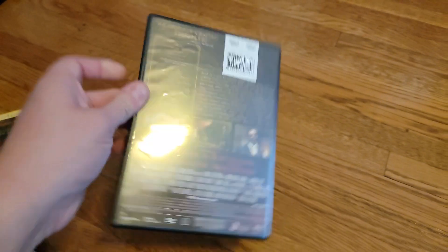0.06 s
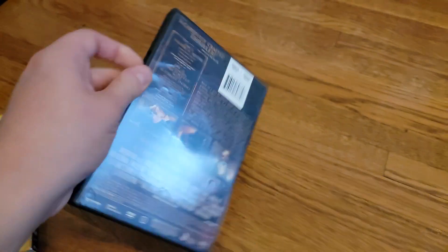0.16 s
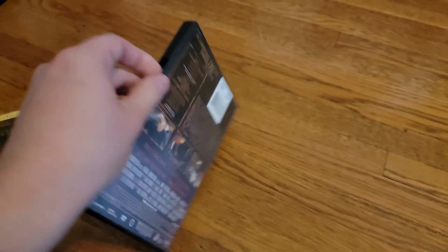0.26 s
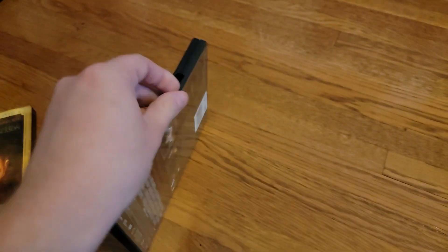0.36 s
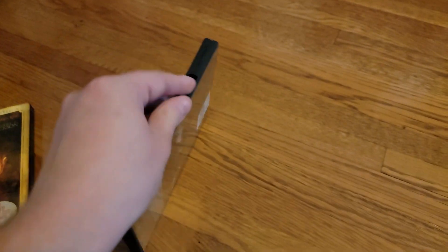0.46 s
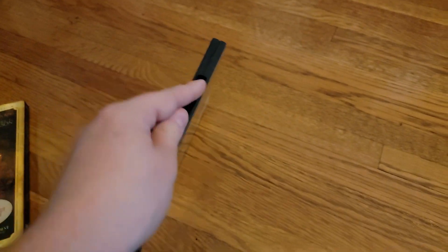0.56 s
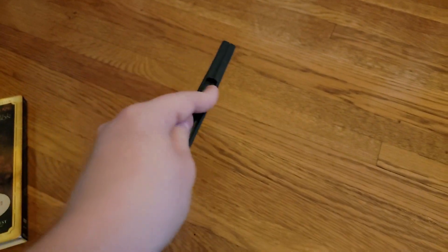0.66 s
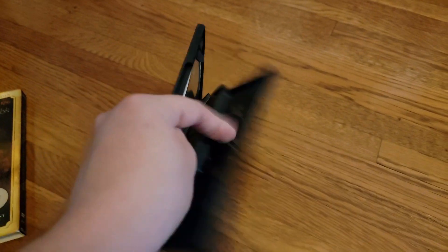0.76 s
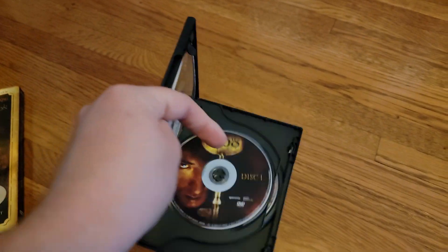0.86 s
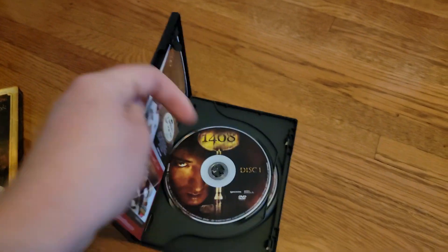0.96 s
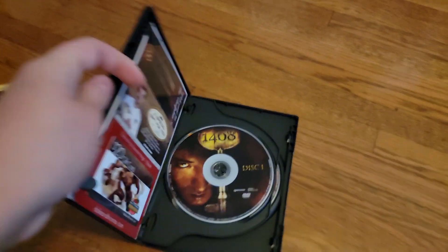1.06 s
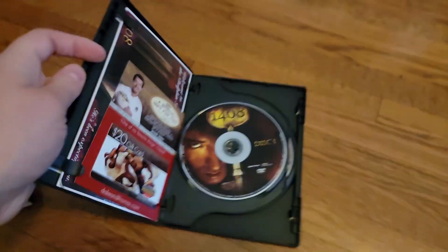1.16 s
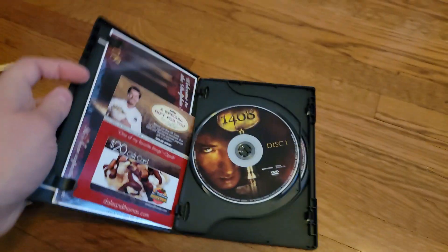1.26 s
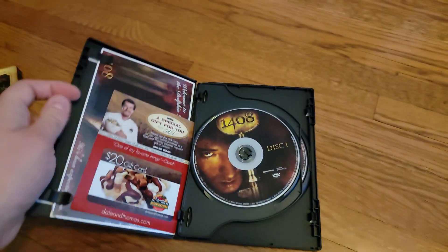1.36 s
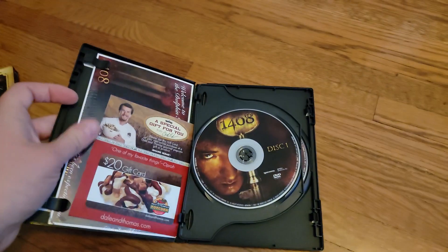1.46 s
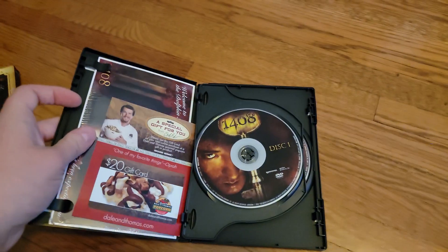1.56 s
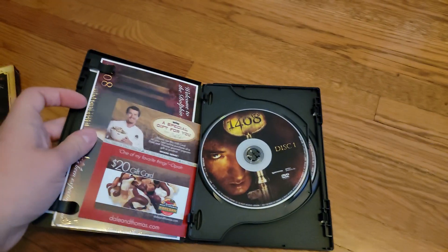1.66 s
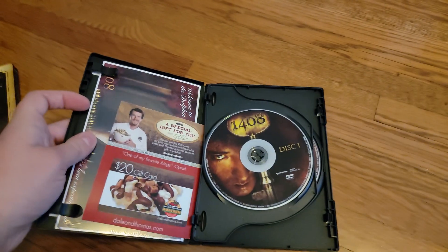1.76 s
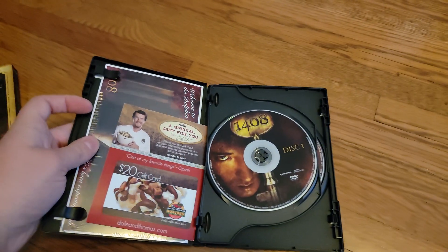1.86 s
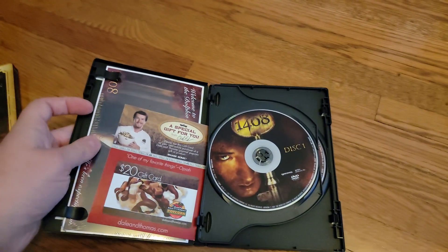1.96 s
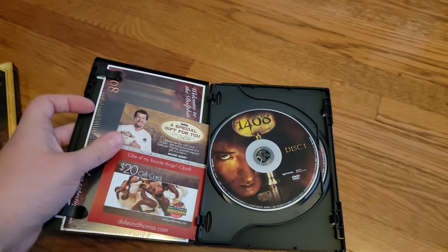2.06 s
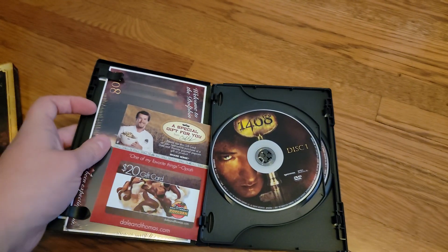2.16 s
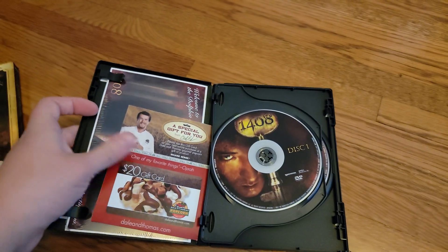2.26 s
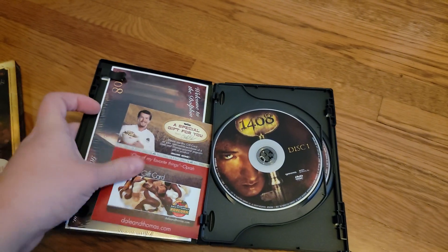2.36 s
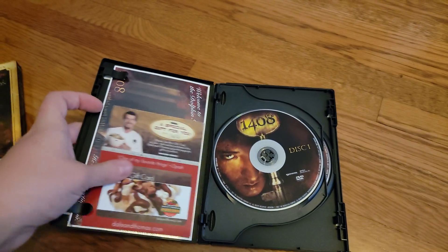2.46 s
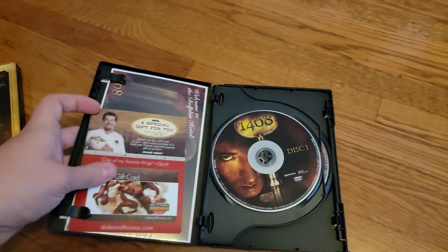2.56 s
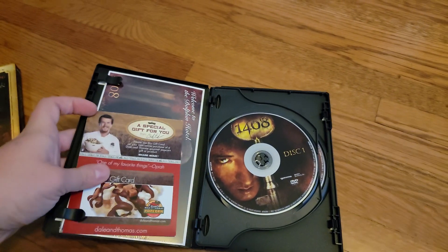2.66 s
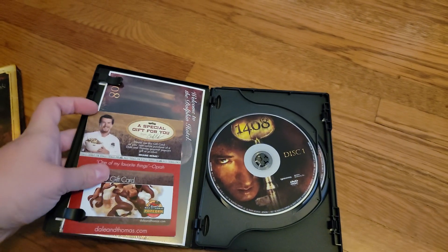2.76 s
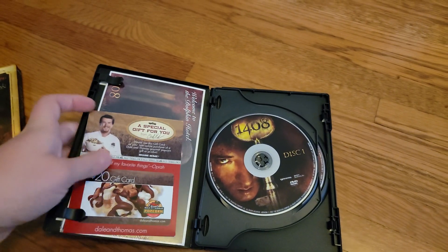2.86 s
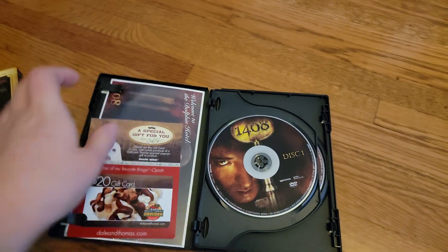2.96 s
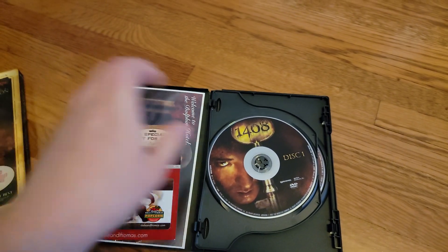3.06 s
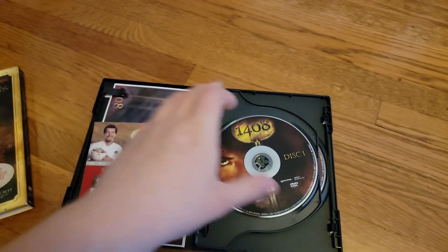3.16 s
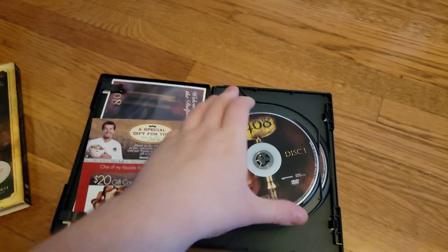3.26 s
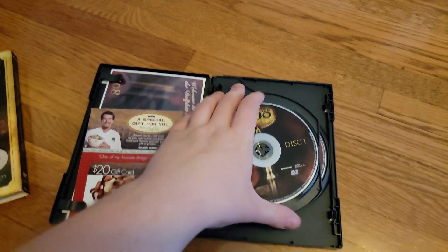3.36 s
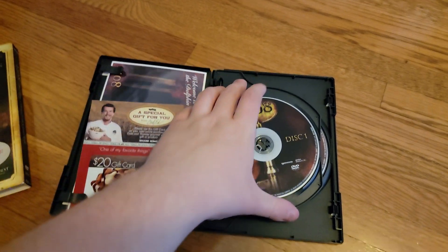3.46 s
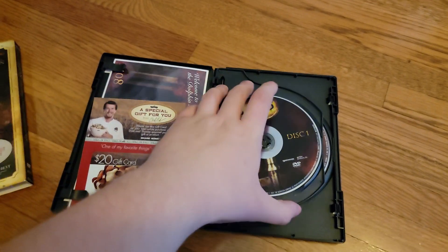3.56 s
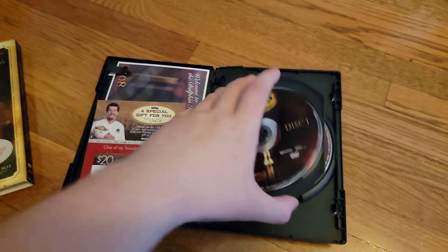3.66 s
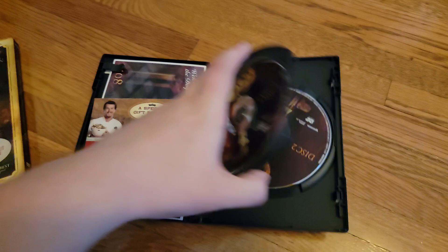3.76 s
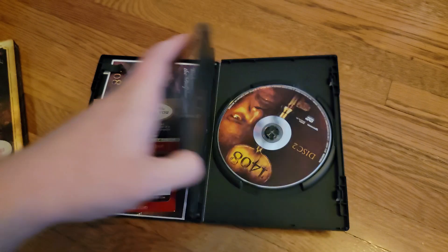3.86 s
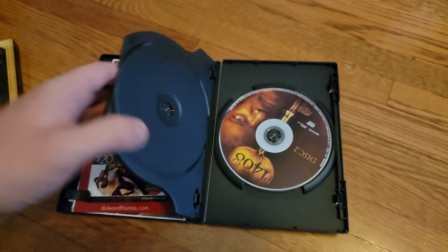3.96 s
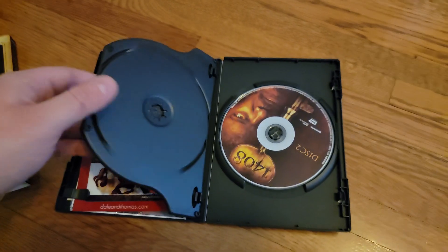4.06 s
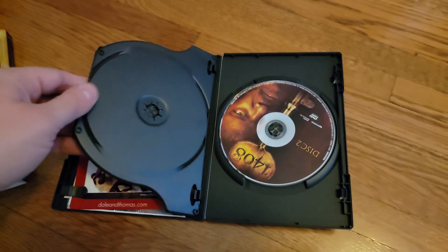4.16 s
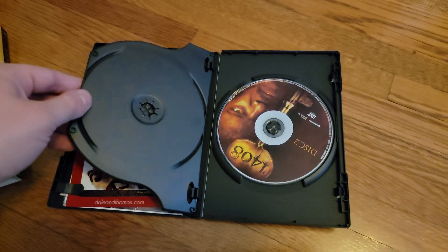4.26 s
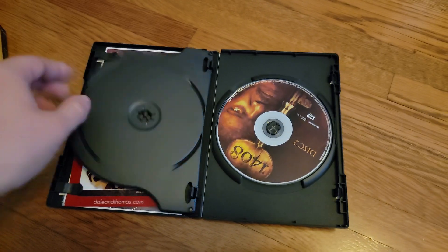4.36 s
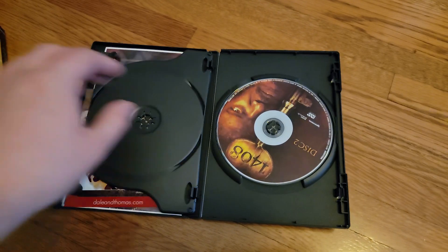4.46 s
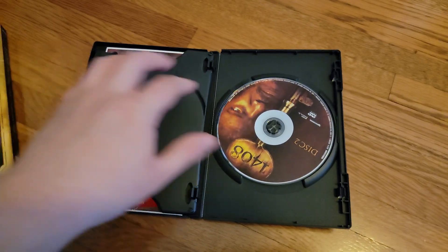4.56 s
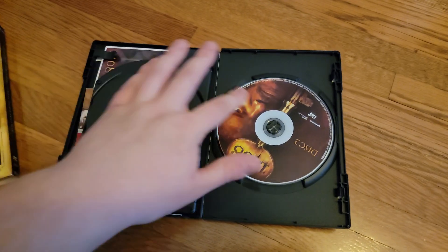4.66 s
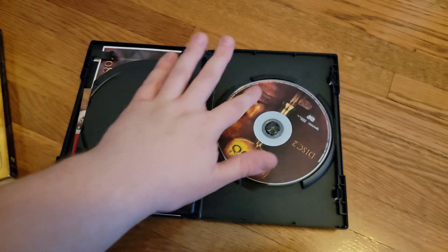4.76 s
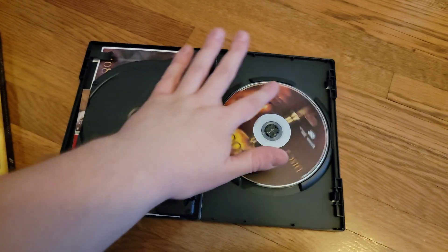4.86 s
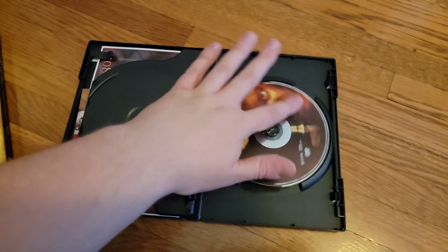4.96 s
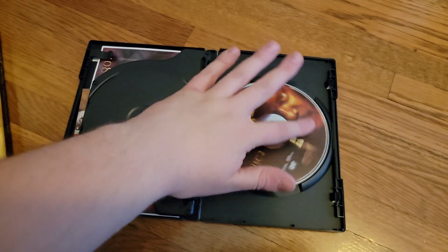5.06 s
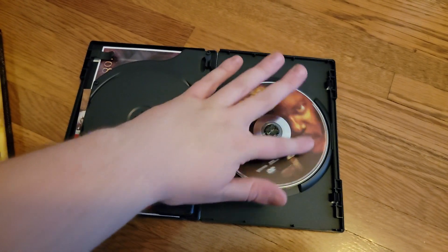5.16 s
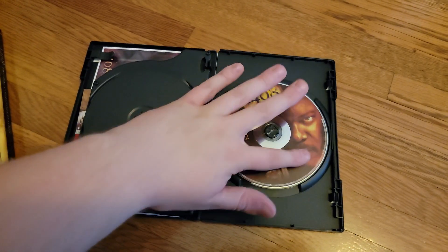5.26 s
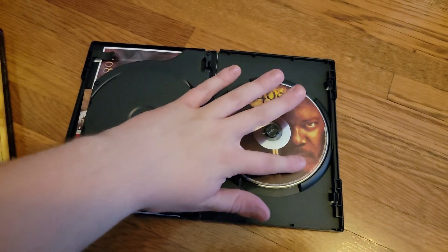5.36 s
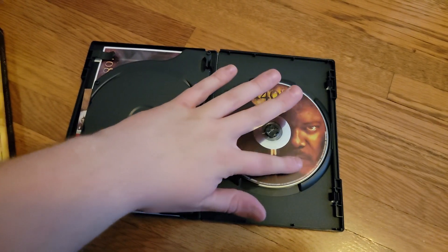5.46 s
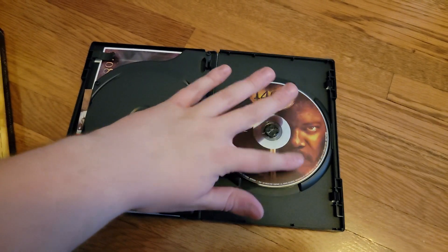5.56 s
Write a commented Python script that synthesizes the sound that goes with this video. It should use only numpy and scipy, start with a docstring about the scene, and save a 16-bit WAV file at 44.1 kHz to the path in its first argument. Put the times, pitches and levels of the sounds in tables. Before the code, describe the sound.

Sharp plastic snaps as a disc case is opened on a wooden floor, then small clicks, a swinging tray and another hard snap.

```python
"""Latches, edges and catches of a plastic disc case snap as it is opened on a wooden floor: noise bursts through plastic.
The sleeve crackles in single flips, taps and disc clicks excite decaying modes, the tray rattles, its hinge chirps.
Fingers scuff in showers of micro-clicks; cloth is filtered noise swept by the arm; air and a low hum lie beneath.
A small room is decaying band noise. The left microphone is muffled, so nearly all is heard on the right.
Table levels are relative: trims and mix gains in the functions follow."""
import sys
import numpy as np
from scipy import signal
from scipy.fft import rfft, irfft
from scipy.io import wavfile
from scipy.ndimage import uniform_filter1d

SR = 44100
rng = np.random.default_rng(int(sys.argv[2]) if len(sys.argv) > 2 else 0)


def output_pcm(signal):
    """Save a mono or channel-first signal as 16-bit PCM at the path in sys.argv[1].

    Samples are clipped to [-1, 1] before scaling.
    """
    pcm = np.clip(np.atleast_2d(signal).T, -1, 1) * 32767
    wavfile.write(sys.argv[1], SR, np.round(pcm).astype(np.int16))


N = 247928
TIME = np.arange(N) / SR
LYING_S = 1.2  # from here the case lies open on the floor
PART_DB, PART_WIDTH = -2, 0.2  # boost of the struck part; half width as a share of its pitch


def undb(db):
    """Decibels to gain."""
    return 10 ** (np.asarray(db) / 20)


def along(hz, points_hz, values):
    """Straight lines on a log-frequency axis."""
    return np.interp(np.log(np.maximum(hz, 1)), np.log(points_hz), values)


def colour(x, points, size=2048):
    """Minimum-phase filter with the given (f/Hz, gain/dB) response, by folding the cepstrum."""
    gain_db = along(np.fft.rfftfreq(size, 1 / SR), *np.transpose(points))
    cepstrum = irfft(np.log(undb(gain_db)))
    cepstrum[1:size // 2] *= 2
    cepstrum[size // 2 + 1:] = 0
    impulse = irfft(np.exp(rfft(cepstrum)))
    return signal.fftconvolve(x, impulse)[:len(x)]


def band(x, lo_hz, hi_hz):
    """Butterworth band-pass."""
    return signal.sosfilt(signal.butter(2, [lo_hz, hi_hz], "band", fs=SR, output="sos"), x)


def rms(x):
    """Root-mean-square level."""
    return np.sqrt(np.mean(x ** 2))


def loudest(x, size=160):
    """RMS of the loudest few milliseconds."""
    return np.sqrt(uniform_filter1d(x ** 2, size, mode="constant").max())


def fade(t, t60_s):
    """Exponential decay, 60 dB in t60_s."""
    return np.exp(-np.log(1000) * t / max(t60_s, 1e-3))


def add(track, s, x):
    """Mix a sound in at time s."""
    i = max(int(s * SR), 0)
    track[i:i + len(x)] += x[:N - i]


def walk(rate_hz):
    """Random wander: straight lines between normal draws, rate_hz draws a second."""
    knots = rng.standard_normal(512)
    return np.interp(TIME * rate_hz, np.arange(len(knots)), knots)


def modes(table, t, scatter_db=0.5, detune=0.017):
    """Decaying sines; each call draws new weights, signs and slight detuning."""
    out = np.zeros(len(t))
    for hz, db, t60_s in table:
        weight, sign, bend = rng.standard_normal(3)
        sine = np.sin(2 * np.pi * hz * (1 + detune * bend) * t)
        out += undb(db + scatter_db * weight) * np.sign(sign) * sine * fade(t, t60_s)
    return out


# quiet room spectrum: f/Hz, level/dB
AIR_SPECTRUM = [(29, -37.5), (50, -0.5), (63, -4.5), (181, -20.5), (209, -23), (242, -17.5), (380, -21.5),
                (658, -31.5), (987, -25), (1380, -30), (1840, -28), (3180, -37.5), (5770, -42),
                (8070, -60.5), (15000, -49)]
AIR_DB = -70.5
HUM_REST_DB, HUM_EXCESS_DB, HUM_SETTLE_S = -72, 16.5, 1.2  # excess decays by 1/e per settle time
# faint hollow tones at the start: f/Hz, width/Hz, level/dB
AIR_TONES = [(823, 51, -70), (1100, 70, -77)]
AIR_TONE_T60_S = 2.2


def background(hum_hz=38, width_hz=6, wander_db=0.76, hum_wander_db=4.6):
    """Still room air, a wavering low hum that settles, and faint hollow tones that die away."""
    air = colour(rng.standard_normal(N), AIR_SPECTRUM)
    hum_phase = 2 * np.pi * np.cumsum(hum_hz + width_hz / 2 * walk(31)) / SR
    hum = np.sin(hum_phase) * undb(hum_wander_db * walk(21))
    hum_db = HUM_REST_DB + HUM_EXCESS_DB * np.exp(-TIME / HUM_SETTLE_S)
    out = air / rms(air) * undb(AIR_DB + wander_db * walk(1.4))
    out += hum / rms(hum) * undb(hum_db)
    for hz, width, db in AIR_TONES:
        tone = band(rng.standard_normal(N), hz - width / 2, hz + width / 2)
        out += undb(db) * tone / rms(tone) * fade(TIME, AIR_TONE_T60_S)
    return out


# room decay: f/Hz, t60/s, level/dB
ROOM_DECAY = [(120, 0.36, -2), (503, 0.085, -5), (1490.5, 0.27, 2), (3300, 0.33, -6), (6700, 0.19, 2),
              (13800, 0.16, 6.5)]


def room(x, delay_s=0.0073, build_s=0.001, size=32768):
    """Dense reflections of a small room: noise bands, each with its own decay and level."""
    t, edges_hz = TIME[:size], np.geomspace(60, 17000, 10)
    points_hz, t60s, dbs = np.transpose(ROOM_DECAY)
    tail = np.zeros(size)
    for lo, hi in zip(edges_hz, edges_hz[1:]):
        hz = np.sqrt(lo * hi)
        noise = band(rng.standard_normal(size), lo, hi)
        tail += noise * fade(t, along(hz, points_hz, t60s)) * undb(along(hz, points_hz, dbs))
    tail *= 1 - np.exp(-np.maximum(t - delay_s, 0) / build_s)
    return signal.fftconvolve(x, tail / np.linalg.norm(tail))[:N]


# rubbing cloth spectrum: f/Hz, level/dB
CLOTH_SPECTRUM = [(300, -16.5), (1000, -16), (1600, -10), (2600, -1.5), (5000, 0.5), (6700, -1),
                  (8400, -27), (10000, -18), (12000, -9.5), (15500, -20.5)]
# arm sweeps: peak t/s, level/dB, rise/s, fall/s, top treble sheen/dB
ARM_SWEEPS = [(0.609, -59.5, 0.21, 0.13, -5), (1.151, -58.5, 0.45, 0.31, 0), (3.281, -59.5, 0.2, 0.15, 3.5),
              (3.779, -60.5, 0.091, 0.33, 8), (4.0, -63.5, 0.43, 0.28, -2.5), (4.681, -62, 0.21, .26, 7),
              (5.079, -75.5, .3, 0.72, -7.5)]
SWEEP_DROP_DB, SWEEP_ROUNDNESS = 21.5, 0.74  # drop one rise before or one fall after the peak; 1 = pointed


def cloth(flutter_db=1.0, bounce=0.5, bounce_s=0.0036, sway=0.017):
    """Fibres rub as the arm moves; their bounce off the floor colours them in shifting stripes."""
    fibres = colour(rng.standard_normal(N), CLOTH_SPECTRUM)
    delay_s = bounce_s * (1 + sway * walk(0.98))
    fibres = fibres + bounce * np.interp(TIME - delay_s, TIME, fibres)
    fibres /= rms(band(fibres, 3500, 7500))
    sheen = band(fibres, 9000, 16000)
    out = np.zeros(N)
    for s, db, rise_s, fall_s, sheen_db in ARM_SWEEPS:
        away = np.maximum((s - TIME) / rise_s, (TIME - s) / fall_s)
        level = undb(db - SWEEP_DROP_DB * np.abs(away) ** SWEEP_ROUNDNESS)
        out += level * (fibres + (undb(sheen_db) - 1) * sheen)
    return out * undb(flutter_db * walk(52))


def puff(centre_s=0.87, hz=42, level_db=-59, length_s=0.06):
    """The lid springs open and wafts a few slow cycles of air at the microphone."""
    t = TIME - centre_s
    return undb(level_db) * np.sqrt(2) * np.sin(2 * np.pi * hz * t) * np.exp(-(t / length_s) ** 2)


# tray hinge chirp: t/s, length/s, f/Hz, level/dB
HINGE_CHIRP = (3.847, .016, 2420, -58)


def hinge(glide=0.16):
    """A short rising squeak as the tray turns: a gliding sine in a half-sine envelope."""
    s, length_s, hz, db = HINGE_CHIRP
    out, turn = np.zeros(N), np.linspace(0, 1, int(length_s * SR))
    phase = 2 * np.pi * np.cumsum(hz * (1 + glide * (turn - 0.5))) / SR
    x = np.sin(phase) * np.sin(np.pi * turn)
    add(out, s, undb(db) * x / rms(x))
    return out


def burst(ring_s, give_s, size=8192):
    """The plastic gives way within give_s, then bending waves scatter through it and die."""
    t = TIME[:size]
    return rng.choice([-1., 1.], size) * fade(t, ring_s) * np.minimum(t / give_s, 1) ** 2


def even(x, size=40):
    """Spread the energy of a burst evenly over frequency."""
    spectrum = rfft(x)
    return irfft(spectrum / np.sqrt(uniform_filter1d(np.abs(spectrum) ** 2, size) + 1e-12))


# thin panel ringing: f/Hz, level/dB, t60/s
PANEL_MODES = [(830, -8, .04), (1140, -7, 0.064), (1470, -9, 0.022), (1830, -3, 0.036), (2072, -9, 0.15),
               (2630, -5.5, 0.15), (2870, -5, 0.087), (3050, -0.5, 0.087), (3070, -4, 0.063),
               (4340, -4.5, 0.1), (4730, -5.5, 0.023), (6440, -11.5, .05)]
# plastic click spectrum: f/Hz, level/dB
CLICK_SPECTRUM = [(70, -13), (300, -10), (500, -8.5), (800, 2.5), (1400, -3.5), (2100, -1), (3100, 1),
                  (4200, -1.5), (5500, 0), (6900, -3.5), (8300, -21.5), (9300, -11.5), (12000, -6),
                  (15500, -14)]


def plastic(push, knock_db, edge_db, sizzle_db, panel_db=-50):
    """A force on the case: panels ring; broad contacts knock, sharp ones stress the treble."""
    t = TIME[:len(push)]
    rung = push + undb(panel_db) * signal.fftconvolve(push, modes(PANEL_MODES, t))[:len(t)]
    contact = [(400, knock_db / 2 - 1.5), (780, knock_db), (1350, knock_db), (2400, 0), (3600, 0.00055),
               (5500, edge_db), (7500, edge_db), (9500, sizzle_db)]
    return colour(colour(rung, CLICK_SPECTRUM), contact)


def click(knock_db, edge_db, sizzle_db, part_hz, ring_s, rebound=0, rebound_s=0.0024,
          give_s=0.00091, size=8192):
    """A burst in the shell, coloured by the struck part; a catch may rebound twice."""
    push = np.zeros(N)
    for k in range(3):
        add(push, k * rebound_s, np.clip(rebound, 0, 1) ** k * burst(ring_s, give_s))
    push = even(push[:size]) * np.minimum(TIME[:size] / give_s, 1)
    push[size // 2:] = 0
    x = plastic(push, knock_db, edge_db, sizzle_db)
    x = x + undb(PART_DB) * band(x, part_hz / (1 + PART_WIDTH), part_hz * (1 + PART_WIDTH))
    return x / loudest(band(x, 1500, 8000))


def lying(x, hollow=0.47, gap_s=0.000722, damp_t60_s=0.21):
    """Flat on the floor the case is damped; sound bouncing in the gap beneath rings hollow."""
    t = TIME[:len(x)]
    x = x + hollow * np.interp(t - gap_s, t, x, left=0)
    return x * fade(t, damp_t60_s) / np.hypot(1, hollow)


# hollow bending of the whole case: f/Hz, level/dB, t60/s
BODY_MODES = [(89, -18, 0.18), (138, -4.5, 0.065), (165, -10.5, 0.17), (253, -3, 0.085), (281, -6, 0.18),
              (392, -4, 0.069), (525, -15.5, 0.15), (747, -8, 0.052)]


def thump(s, rise_s=0.0025, floor_db=-10, floor_t60_s=0.16, pressed_t60_s=0.022, size=8192):
    """The case flexes and the floorboards rumble under it; lying flat, it is stopped sooner."""
    t = TIME[:size]
    case = modes(BODY_MODES, t, scatter_db=3, detune=0.0098)
    boards = band(rng.standard_normal(size), 120, 600) * fade(t, floor_t60_s)
    x = case / rms(case) + undb(floor_db) * boards / rms(boards)
    x *= 1 - np.exp(-t / rise_s)
    if s > LYING_S:
        x *= fade(t, pressed_t60_s)
    return x / loudest(x)


# skin, paper and plastic rubbing the case: t/s, length/s, level/dB, knock/dB, edge/dB
RUBS = [(0.063, 0.056, -66.5, 0, 2.5), (0.43, 0.055, -52.5, -1, -8.5), (0.842, 0.06, -42.5, 2, -10),
        (0.652, 0.086, -67.5, 3.5, 5.5), (0.816, 0.084, -54, 6, 0), (0.974, 0.043, -31, -11.5, -6.5),
        (1.238, 0.025, -49, -2, -3.5), (1.289, 0.075, -59, -3, 0), (1.662, 0.074, -55, -5, -1),
        (1.801, 0.22, -73, 1, -10), (2.151, 0.08, -72, 0, -10), (2.569, 0.034, -63.5, 4.5, -8.5),
        (2.642, 0.078, -65, -1.5, -10), (2.918, 0.077, -64.5, 2, 0.5), (3.02, 0.19, -74, 0, -17.5),
        (3.744, 0.053, -56.5, 5.5, -4), (4.024, 0.07, -65.5, 9, 4), (4.16, 0.4, -73, -6.5, -18),
        (4.371, 0.065, -69.5, -12, -8), (4.482, 0.0026, -52, 1, -6), (4.809, 0.08, -66.5, -17, 4),
        (5.091, 0.026, -63, -8, -11)]


def scuffs(slips_per_s=1800, panel_db=-44, spread_db=2.5, dull_db=-12, size=16384):
    """Stick and slip: a short shower of uneven micro-clicks into the panels."""
    out, t = np.zeros(N), TIME[:size]
    for s, length_s, db, knock_db, edge_db in RUBS:
        slips = (rng.random(size) < slips_per_s / SR) * rng.choice([-1, 1], size)
        slips = slips * undb(spread_db * rng.standard_normal(size))
        pressure = np.sin(np.pi * np.minimum(t / length_s, 1))
        x = plastic(slips * pressure, knock_db, edge_db, edge_db + dull_db, panel_db)
        add(out, s, undb(db) * x / rms(x[:int(length_s * SR)]))
    return out


# tray swings over: start/s, end/s
TRAY_SWING_S = (3.72, 4.09)
# thin high tick as the tray is let down: t/s, level/dB, f/Hz
LET_DOWN_TICK = [(4.188, -69.5, 7200)]


def rattle(level_db=-57, spread_db=0.5, knock_db=-2, edge_db=-10, sizzle_db=-22,
           low_hz=900, high_hz=4500, ring_s=0.019, tick_ring_s=0.0072, count=16):
    """The swinging tray chatters at random, each time at a random pitch, and settles with a thin tick."""
    out = np.zeros(N)
    for _ in range(count):
        s = rng.uniform(*TRAY_SWING_S)
        part_hz = low_hz * (high_hz / low_hz) ** rng.random()
        x = lying(click(knock_db, edge_db, sizzle_db, part_hz, ring_s))
        add(out, s, undb(level_db + spread_db * rng.standard_normal()) * x)
    for s, db, hz in LET_DOWN_TICK:
        x = band(burst(tick_ring_s, 0.00035), hz / (1 + PART_WIDTH), hz * (1 + PART_WIDTH))
        add(out, s, undb(db) * x / loudest(x))
    return out


# disc on its hub under the fingers: t/s, level/dB, knock/dB, edge/dB, struck part f/Hz
HUB_CLICKS = [(2.699, -57, -20, -47, 2700), (3.4381, -57.5, 1.5, -30, 2600),
              (3.4871, -47.5, -11, -20.5, 2700), (3.549, -61, -10, -26.5, 2460),
              (4.813, -54.5, -16.5, -24.5, 4150), (4.825, -54.5, -21, -15, 2860),
              (4.9249, -47, -18, -13.5, 2760), (5.001, -67, -20.5, -24.5, 2570),
              (5.0793, -40.5, -15.5, -10, 3040), (5.2091, -61, -4.5, -15.5, 1292)]
# disc ringing: f/Hz, level/dB, t60/s
DISC_MODES = [(1112, -3.5, 0.084), (1343, 4.5, 0.053), (1552, -2, 0.094), (2370, -3, 0.089), (2600, 1, 0.1),
              (3170, -16.5, 0.09), (4416, 6, 0.044), (4790, 8, 0.015), (5410, -2, 0.038)]


def discs(gain_db=-1, ring_db=-7, contact_s=0.014, dull_db=-14, size=8192):
    """A disc knocks on its hub: a dry click, and the disc rings briefly."""
    out = np.zeros(N)
    for s, db, knock_db, edge_db, part_hz in HUB_CLICKS:
        ring = modes(DISC_MODES, TIME[:size], scatter_db=5.5, detune=0.0078)
        x = click(knock_db, edge_db, edge_db + dull_db, part_hz, contact_s)
        x = x + undb(ring_db) * ring / loudest(ring)
        add(out, s, undb(db + gain_db) * x)
    return out


# light taps of fingers and tray: t/s, level/dB, thump/dB, knock/dB, edge/dB, struck part f/Hz
LIGHT_TAPS = [(0.6847, -56.5, 3.5, -2.5, -11, 880), (2.583, -59, -18, 20.5, -12, 1115),
              (2.597, -51, -25.5, -1, -5.5, 2540), (2.6443, -51, 3, 11.5, 0, 970),
              (2.9285, -62, -17.5, 3, 2.5, 1197), (3.7288, -45, -14, -8, -4.5, 4280),
              (3.7576, -49.5, -5.5, -1, -10, 2600), (3.768, -40.5, -10, -28, -14, 3300),
              (3.7926, -48, -9, -2, -10, 4180), (3.9093, -50, -30, 6, -10, 935),
              (3.93, -43.5, -21, 2, -3.5, 1100), (3.9417, -54, -23, -31, -10, 1230),
              (4.0156, -44, -18, -32, -3, 3280), (4.0223, -51.5, -1.5, 3, -4, 2900),
              (4.0615, -47, -6, -30, -6, 3850)]


def taps(body_db=-7, dull_db=-15, broad_db=2, lid_db=-6, lid_hz=450, lid_t60_s=0.18,
         ring_s=0.03, size=8192):
    """Light contacts with case and tray; on the floor the open lid adds a hollow knock."""
    out = np.zeros(N)
    for s, db, thump_db, knock_db, edge_db, part_hz in LIGHT_TAPS:
        x = click(knock_db + broad_db, edge_db, edge_db + dull_db, part_hz, ring_s)
        x = x + undb(thump_db + body_db) * thump(s)
        if s > LYING_S:
            lid = modes([(lid_hz, 0, lid_t60_s)], TIME[:size])
            x = lying(x + undb(thump_db + lid_db) * lid)
        add(out, s, undb(db) * x)
    return out


# sleeve buckles as the spine is pressed flat: t/s, level/dB
SLEEVE_TICKS = [(1.6431, -41), (1.6511, -40.5), (1.6565, -33.5), (1.6645, -34.5), (1.6734, -41),
                (1.6809, -37.5), (1.6831, -36.5), (1.7, -45), (1.713, -44), (1.76, -48.5), (1.7824, -38),
                (2.467, -67.5)]
# lesser ticks fall within: start/s, end/s
LESSER_TICKS_S = (1.645, 1.71)
# buckling sleeve spectrum: f/Hz, level/dB
SLEEVE_SPECTRUM = [(150, -58), (550, -29), (850, -11), (1200, -20.5), (1950, -20.5), (2450, -3.5),
                   (3050, 3), (3800, -1.5), (6400, -6), (8600, -36.5), (12000, -24), (15500, -34)]


def crackle(ring_s=0.015, scatter=0.071, lesser_db=-49, spread_db=2.0, count=4):
    """The thin sleeve buckles in tiny, dry ticks: one sharp flip and a little scatter after it."""
    out = np.zeros(N)
    ticks = list(SLEEVE_TICKS)
    for _ in range(count):
        ticks.append((rng.uniform(*LESSER_TICKS_S), lesser_db + spread_db * rng.standard_normal()))
    for s, db in ticks:
        flip = scatter * burst(ring_s, give_s=0.00026)
        flip[0] += 1
        x = colour(flip, SLEEVE_SPECTRUM)
        add(out, s, undb(db) * x / loudest(x))
    return out


# hard snaps of edges, latches and tray: t/s, level/dB, thump/dB, knock/dB, edge/dB, sizzle/dB,
# struck part f/Hz, ring t60/s, rebound/0-1, room/dB
HARD_SNAPS = [(0.4122, -38, 0, 1, 0, -13.5, 3300, 0.029, .5, -6.5),
              (0.4513, -42.5, 10, 3, 0, -17, 3600, 0.046, .4, -9.5),
              (0.8361, -17, -15, -2.5, -8.5, -21.5, 1950, 0.019, 0.6, -7),
              (0.949, -21.5, -11, -11.5, -4.5, -13.5, 3200, 0.022, .1, -14),
              (0.965, -15, -19, -13.5, -4.5, -12, 3200, 0.024, .85, -6.5),
              (1.0061, -27, -16.5, -15, -5, -15, 3400, 0.016, .3, 1.5),
              (1.263, -34, -16.5, -7, -16.5, -21.5, 2500, 0.0068, .1, -7),
              (4.4861, -28, -10.5, -3.5, -3, -9, 4210, 0.018, 0.31, -10.5)]
# open case and tray ringing on the floor: f/Hz, level/dB, t60/s
TRAY_MODES = [(258, -10, 0.027), (983, -8, 0.019), (1850, -7.5, 0.017), (3030, -1, 0.016),
              (4340, 3.5, 0.012), (4570, -1, .013), (5500, -0.5, 0.016), (6430, 7, 0.0067)]


def snaps(body_db=-2, away_hz=1200, tray_db=-1, shell_db=-4, seat_s=0.0012, size=8192):
    """Latches and catches let go: direct sound, and what the other case faces throw into the room."""
    near, far = np.zeros(N), np.zeros(N)
    for s, db, thump_db, knock_db, edge_db, sizzle_db, part_hz, ring_s, rebound, room_db in HARD_SNAPS:
        low = undb(thump_db + body_db) * thump(s)
        hit = click(knock_db, edge_db, sizzle_db, part_hz, ring_s, rebound)
        away = click(knock_db, edge_db, sizzle_db, away_hz, ring_s)
        away = away * rms(hit) / rms(away) + low
        x = hit + low
        if s > LYING_S:
            ring = modes(TRAY_MODES, TIME[:size], scatter_db=2.5, detune=0.0093)
            ring *= np.minimum(TIME[:size] / seat_s, 1) ** 2
            x = lying(x) * undb(shell_db) + undb(tray_db) * ring / loudest(ring)
        add(near, s, undb(db) * x)
        add(far, s, undb(db + room_db) * away)
    return near, far


# muffled left microphone response: f/Hz, gain/dB
MUFFLE_RESPONSE = [(40, -20), (150, -26), (280, -24), (600, -38), (1200, -43), (2500, -49.5), (5000, -66),
                   (14000, -54)]
# left microphone self-noise: f/Hz, level/dB
LEFT_NOISE_SPECTRUM = [(60, 21.5), (450, 24.5), (800, 12), (3200, 5.5), (6000, -5.5), (15000, -11)]


def scene(left_db=1, handling_room_db=-9, crackle_room_db=-11, hiss_db=-94, left_room_db=-5):
    """The right microphone is open; mostly lows, with more room, reach the muffled left one."""
    near, far = snaps()
    handling = taps() + discs() + rattle() + scuffs() + hinge()
    ticks = crackle()
    echo = room(far + undb(handling_room_db) * handling + undb(crackle_room_db) * ticks)
    right = 2 * (near + handling + ticks + echo + cloth() + puff() + background())
    hiss = undb(hiss_db) * colour(rng.standard_normal(N), LEFT_NOISE_SPECTRUM)
    left = colour(right + undb(left_room_db) * room(right), MUFFLE_RESPONSE) + hiss
    return np.array([undb(left_db) * left, right])


def record(dry, top_hz=16000):
    """Round the highest peaks, then cut the top with an elliptic low-pass."""
    rounded = dry / (1 + dry ** 4) ** (1 / 4)
    return signal.sosfilt(signal.ellip(8, 0.2, 70, top_hz, fs=SR, output="sos"), rounded)


dry = scene()
out = record(dry)
output_pcm(out)
```